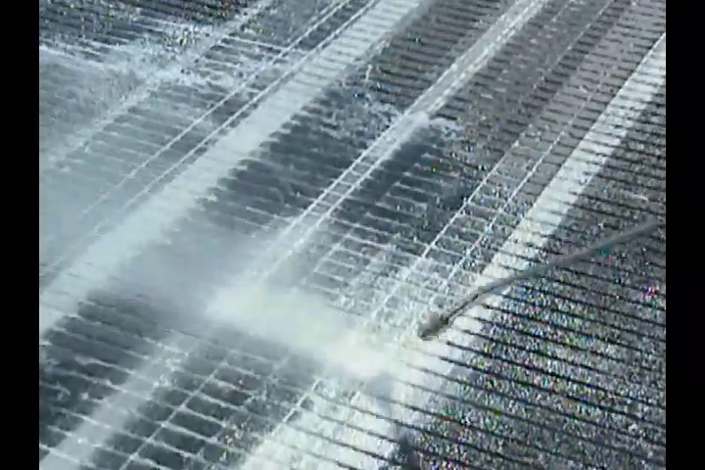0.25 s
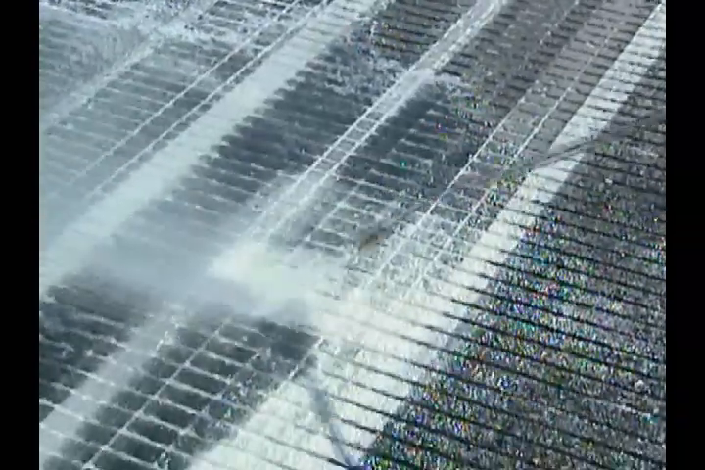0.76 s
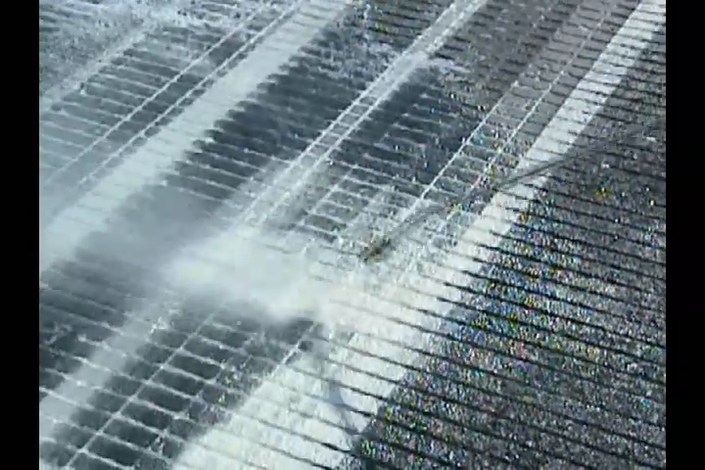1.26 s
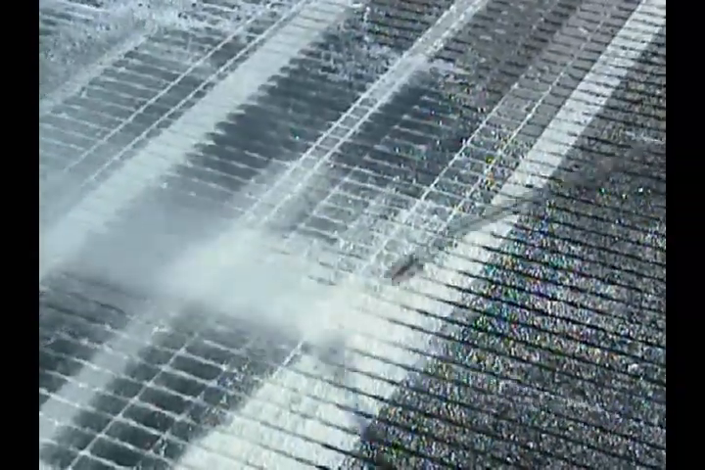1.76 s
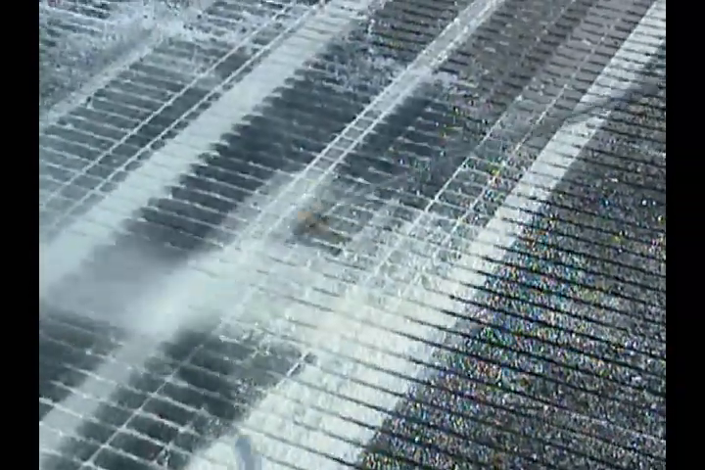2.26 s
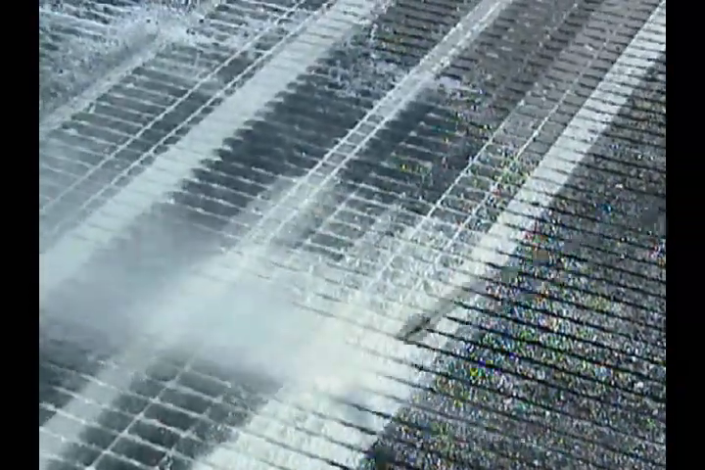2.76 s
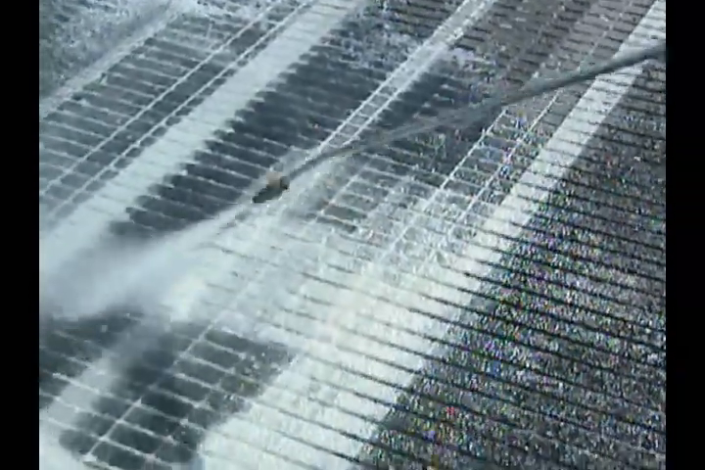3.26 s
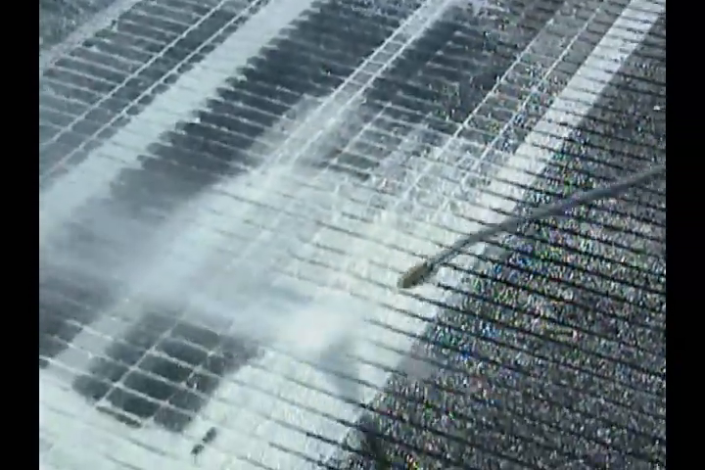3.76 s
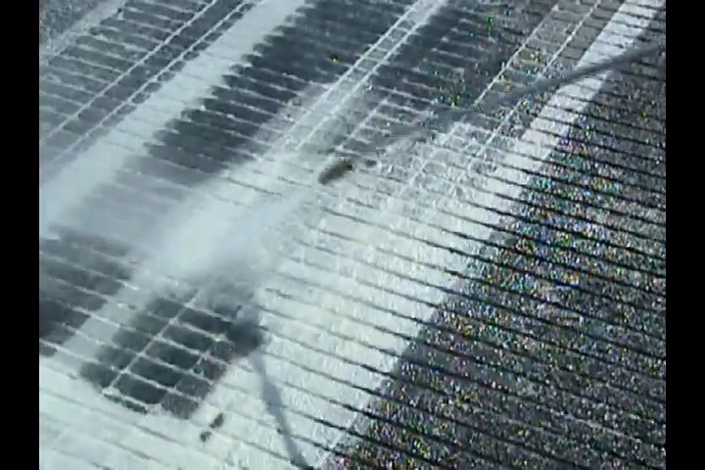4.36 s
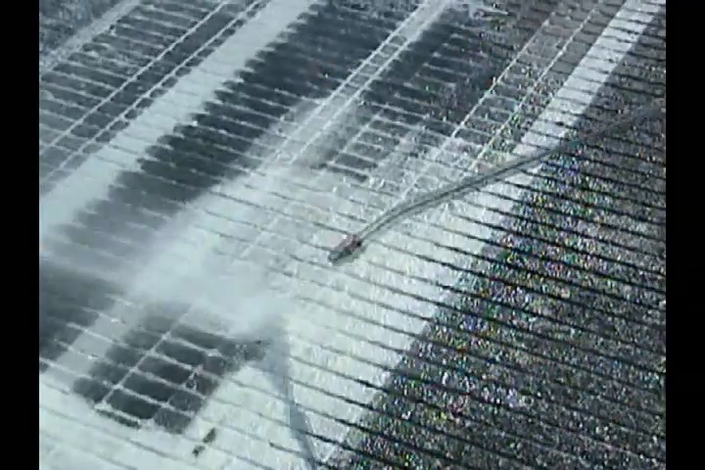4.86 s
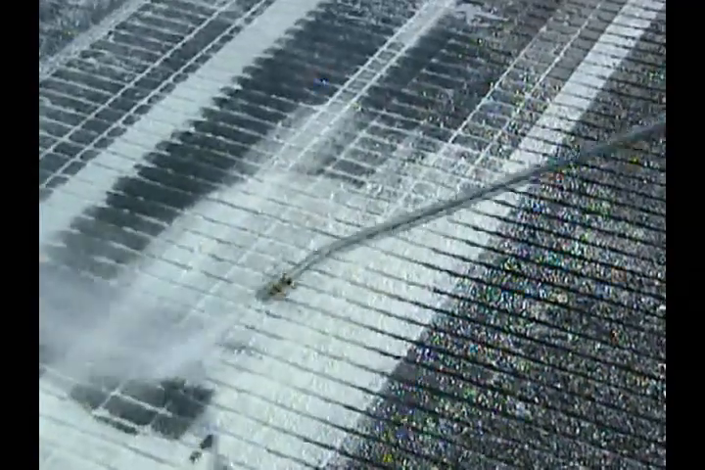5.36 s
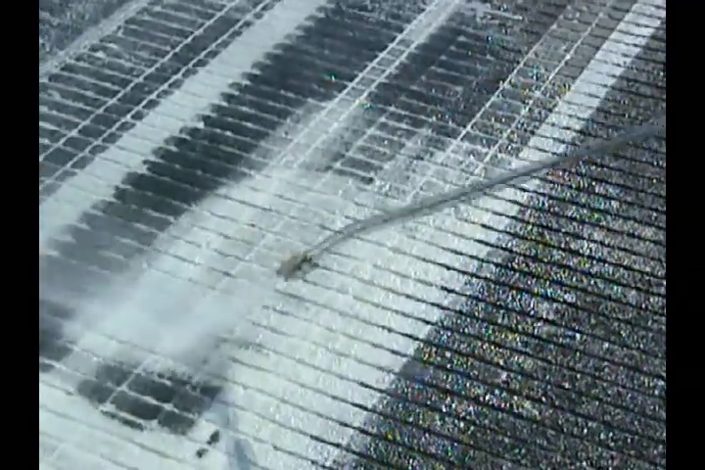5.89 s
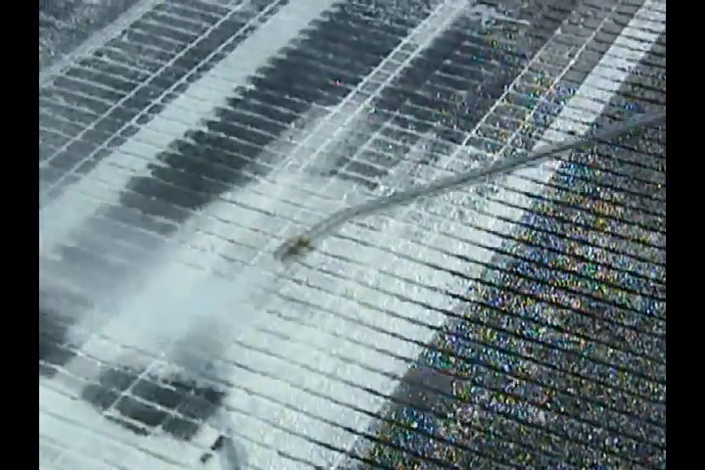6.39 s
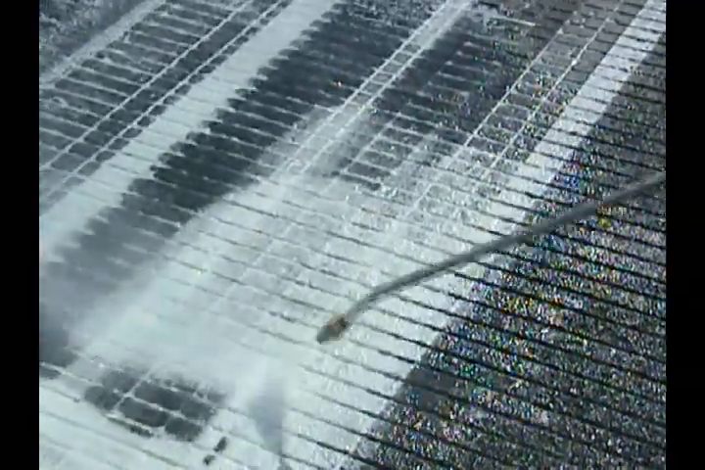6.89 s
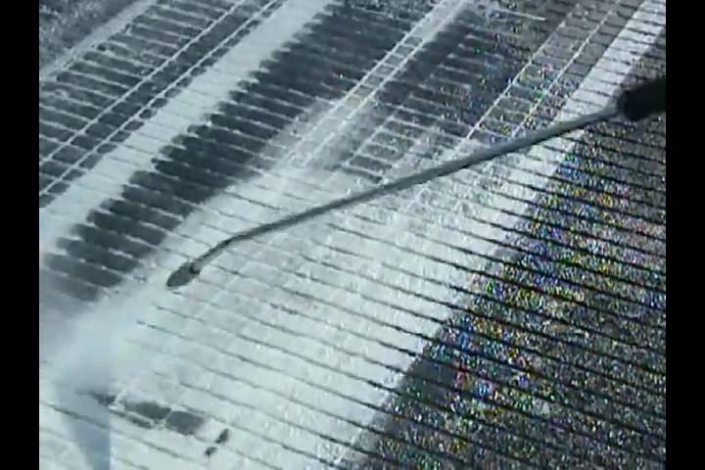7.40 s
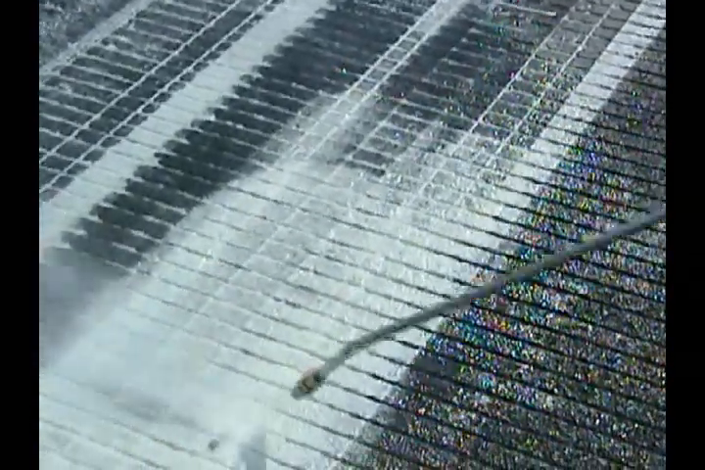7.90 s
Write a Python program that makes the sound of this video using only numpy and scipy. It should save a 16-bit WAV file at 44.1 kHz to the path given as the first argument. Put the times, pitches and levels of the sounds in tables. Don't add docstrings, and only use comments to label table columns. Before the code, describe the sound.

A pressure washer's loud jet sweeps back and forth over outdoor paving, hissing bright then roaring lower, above a steady petrol engine hum.

```python
import sys
import numpy as np
from scipy import signal
from scipy.fft import rfft, irfft, next_fast_len
from scipy.io import wavfile
from scipy.ndimage import map_coordinates

SR = 44100
rng = np.random.default_rng(int(sys.argv[2]) if len(sys.argv) > 2 else 0)


def elevation(decibels):
    levels = np.asarray(decibels, float)
    return 10 ** (levels / 20)


def bounce(signal):
    frames = np.transpose(np.atleast_2d(signal))
    limited = np.clip(frames, -1, 1)
    pcm = np.round(limited * 32767).astype(np.int16)
    wavfile.write(sys.argv[1], SR, pcm)


N = 358974
SIZE = next_fast_len(N + 4096)
HZ = np.maximum(np.arange(SIZE // 2 + 1) * SR / SIZE, 1)
TIME = np.arange(N) / SR
NEARING_S = TIME - TIME.mean()


def in_pitch(rows):
    hz, *columns = np.transpose(rows)
    return np.array([np.interp(np.log(HZ), np.log(hz), column) for column in columns])


def rms_one(x):
    return x / np.sqrt(np.mean(x ** 2) + 1e-20)


def drift(rate_hz):
    step, settling = 40, 2000
    pole = np.exp(-2 * np.pi * rate_hz * step / SR)
    noise = rng.standard_normal(N // step + settling + 2)
    slow = signal.lfilter([1], [1, -2 * pole, pole ** 2], noise)[settling:]
    return np.interp(np.arange(N) / step, np.arange(len(slow)), rms_one(slow))


def spread(pair, width):
    left, right = pair
    return (left + right) / 2 + (left - right) / 2 * width * [[1], [-1]]


# start_s, lift (-1 close to 1 away)
TURNING_POINTS = [(-.25, 0.64), (.4, -0.88), (.96, 0.84), (1.5, -1.02), (2.11, 1.09), (2.62, -0.81),
                  (3.19, 1.2), (3.74, -0.23), (3.92, -0.21), (4.5, 0.94), (5.07, -0.7), (5.63, 0.94),
                  (6.11, -0.48), (6.51, .68), (6.96, -0.72), (7.41, 0.61), (7.84, -0.93), (8.25, 0.98)]


def lance_lift():
    start_s, lift = np.transpose(TURNING_POINTS)
    index = np.arange(len(start_s))
    place = np.interp(TIME, start_s, index)
    eased = np.floor(place) + .5 - .5 * np.cos(np.pi * (place % 1))
    return np.interp(eased, index, lift)


def shaft_angle():
    cycle_hz = 14.895 * (1 + .001 * drift(1.36))
    return 2 * np.pi * np.cumsum(cycle_hz) / SR


# pitch_hz, level_db (per Hz)
MIST_SPECTRUM = [(20, -20), (40, -8), (70, -1), (160, -2), (400, -5.5), (850, -10), (1500, -13),
                 (3000, -25)]


def mist(lift):
    opposed = 0.18
    air = irfft(rfft(rng.standard_normal((2, SIZE))) * elevation(in_pitch(MIST_SPECTRUM)[0]), SIZE)[:, :N]
    air = air - opposed * air[::-1]
    lumps_db = 1.8 * np.array([drift(9.5), drift(5.7)])
    port_db = [[3.0], [1.5]]
    rebound = elevation(-44 - 7 * np.tanh(lift / .4) + 0.8 * NEARING_S)
    steady_rumble = elevation(-45 + 8 * np.minimum(TIME - 3.1, 0))
    return rms_one(air) * np.hypot(rebound, steady_rumble) * elevation(lumps_db + port_db)


# order (multiple of the common cycle), left_db, right_db
ENGINE_ORDERS = [(2, -62.4, -68.3), (4, -39, -45.5), (5, -57.8, -64), (6, -41, -49), (8, -55, -67.6),
                 (10, -52, -56), (11, -68, -65), (12, -54, -55.4), (14, -52, -53), (15, -44, -44.5),
                 (18, -55, -50.5), (20, -55, -51.5), (22, -61, -65), (24, -50, -47.5), (26, -67, -66),
                 (28, -61, -66), (30, -47, -49)]


def engine(angle, lift):
    lag_rad, flutter_db = 0.69, .6
    out = np.zeros((2, N))
    for order, left_db, right_db in ENGINE_ORDERS:
        turned = order * angle + rng.uniform(0, 2 * np.pi)
        left = elevation(left_db) * np.sin(turned)
        right = elevation(right_db) * np.sin(turned - lag_rad * np.sqrt(4 / order))
        out += np.sqrt(2) * np.array([left, right]) * elevation(flutter_db * drift(4.7))
    fan_hz, fan_db = 258, -49.5
    out += elevation(fan_db + flutter_db * drift(3.0)) * np.sin(2 * np.pi * fan_hz * TIME)
    out = spread(out, elevation(2.5 * np.minimum(TIME - 3, 0)))
    swell_db = 2.5 * lift + 0.5 * lift ** 2
    return out * elevation(swell_db - swell_db.mean())


# start_s, extra_path_us (microseconds)
ECHO_PATH = [(0, 852), (1.1, 840), (3.2, 818), (4.2, 838), (4.7, 820), (5.1, 790), (5.75, 780), (6.25, 840),
             (7.0, 772), (8.14, 770)]


def echo(spray):
    echo_db, cut_hz = -11, 5000
    path_us = np.interp(TIME, *np.transpose(ECHO_PATH))
    late = np.arange(N) - path_us * 1e-6 * SR
    dull = signal.sosfiltfilt(signal.butter(1, cut_hz, fs=SR, output="sos"), spray)
    return elevation(echo_db) * np.array([map_coordinates(c, [late], order=3, mode="nearest") for c in dull])


# pitch_hz, level_db (per Hz)
JET_SPECTRUM = [(30, -32), (100, -18), (300, -11), (600, -5.5), (1300, -4.5), (2400, -2.5), (3700, 0),
                (5200, -1), (7600, 1), (9800, -2), (11000, -7.5), (13200, -12), (14300, -13.5),
                (14900, -19)]
# pitch_hz, likeness (0 to 1)
PORT_LIKENESS = [(100, 0.99), (500, 0.96), (1300, 1), (2500, 0.91), (4000, 0.93), (6000, 0.88), (9000, 0.9),
                 (11500, 0.58), (13000, .8), (15000, 0.79)]
# pitch_hz, balance_db (left over right), lead_rad (left ahead)
PORT_DIFFERENCE = [(100, 2.5, 0.2), (500, 0.5, 0.082), (1700, -0.5, -0.12), (2300, -2.2, 0.044),
                   (4600, 0.33, 0.4), (5600, 0.8, 0.18), (7200, 1, .25), (8100, 0.5, 0.13),
                   (9800, -4.5, 0.26), (11300, 5.5, 0.37), (11500, 5.5, 0.98), (12500, 0, 0),
                   (13500, 5.5, .15), (15000, -5, 0)]
# pitch_hz, lift_db (per unit lift), ends_db (extra at either end of the
# swing), nearing_db (per s), width_lift_db (stereo width per unit lift), width_nearing_db (per s)
BAND_RESPONSE = [(100, 3, -1, -1.2, .01, 1.9), (250, 2, 4, 0.1, 6, 1), (404, 3, 4, -0.2, -4, 1.5),
                 (615, 6, 0.2, .01, .04, .45), (1190, 4, 0, 0.15, -1.2, .01),
                 (2200, 3, -1.5, -0.02, 1.6, .01), (3530, 1.8, -2, -0.01, 2, .1),
                 (5170, -1, -1.5, -0.04, .8, .2), (7400, -3, -0.5, .05, 0, .01),
                 (9800, -3.5, -0.5, 0.1, 3, .8), (13000, -5, 0.8, -0.1, 1.6, 0.3)]


def jet(angle, lift):
    level_db, patchy_db, gust_db, throb = -18.3, 0.44, 0.32, .052
    alike = in_pitch(PORT_LIKENESS)[0]
    mid, side = rfft(rng.standard_normal((2, SIZE)))
    mid, side = np.sqrt(1 + alike) * mid, np.sqrt(1 - alike) * side
    balance_db, lead_rad = in_pitch(PORT_DIFFERENCE)
    port = elevation(balance_db / 2) * np.exp(.5j * lead_rad)
    pair = np.array([(mid + side) * port, (mid - side) / port]) * elevation(in_pitch(JET_SPECTRUM)[0])
    reference = (HZ > 2200) & (HZ < 5200)
    pair = pair / np.std(irfft(pair[0] * reference, SIZE))

    ends = lift ** 2 - np.mean(lift ** 2)
    knots = np.log(np.array(BAND_RESPONSE)[:, 0])
    out = np.zeros((2, N))
    for k, row in enumerate(BAND_RESPONSE):
        _, lift_db, ends_db, nearing_db, width_lift_db, width_nearing_db = row
        window = np.interp(np.log(HZ), knots, np.arange(len(knots)) == k)
        band = irfft(pair * window, SIZE)[:, :N]
        width = elevation(width_lift_db * lift + width_nearing_db * NEARING_S)
        swing_db = lift_db * lift + ends_db * ends + nearing_db * NEARING_S
        out += spread(band, width) * elevation(swing_db + patchy_db * drift(16))
    strokes = 1 + throb * np.cos(5 * angle) + .4 * throb * np.cos(10 * angle)
    return out * elevation(level_db + gust_db * drift(29)) * strokes


def scene():
    angle, lift = shaft_angle(), lance_lift()
    spray = jet(angle, lift)
    return spray + echo(spray) + engine(angle, lift) + mist(lift)


def low_pass(x):
    return signal.sosfilt(signal.butter(12, 15630, fs=SR, output="sos"), x)


# pitch_hz, width_hz, level_db
HOUSING_CAVITIES = [(533, 45, 2), (790, 61, 3), (1556, 77, 2), (1750, 44, -1), (4750, 83, 1),
                    (5050, 110, -1.5), (12400, 460, 1.2)]


def record(dry):
    cavity_db = 0
    for pitch_hz, width_hz, level_db in HOUSING_CAVITIES:
        cavity_db = cavity_db + level_db * np.exp(-.5 * ((HZ - pitch_hz) / width_hz) ** 2)
    heard = irfft(rfft(dry, SIZE) * elevation(cavity_db), SIZE)[:, :N]
    rounded = 1.05 * np.tanh(1.03 * heard / 1.05)
    top_cut = signal.ellip(10, .25, 60, 14920, fs=SR, output="sos")
    mix = signal.sosfiltfilt(top_cut, rounded)
    return low_pass(mix)


dry = scene()
out = record(dry)
bounce(out)
```